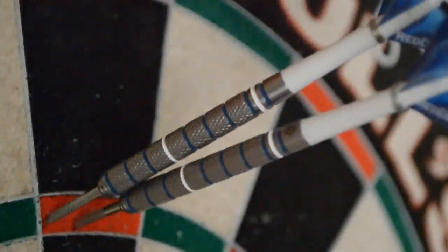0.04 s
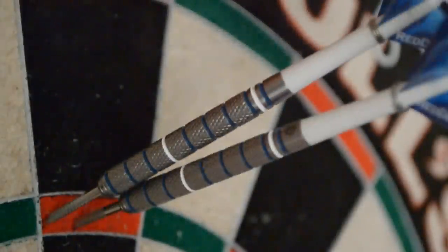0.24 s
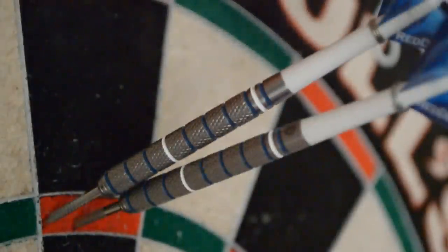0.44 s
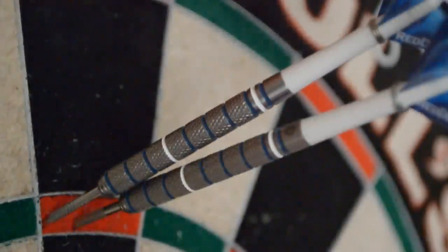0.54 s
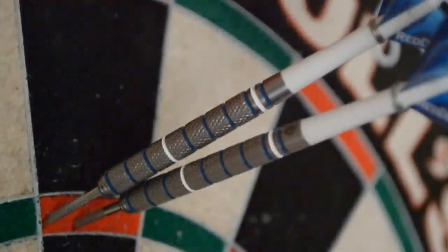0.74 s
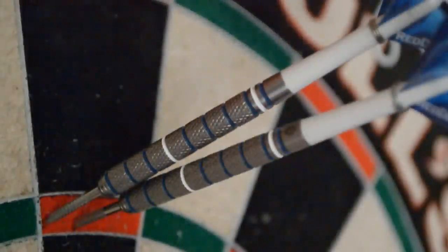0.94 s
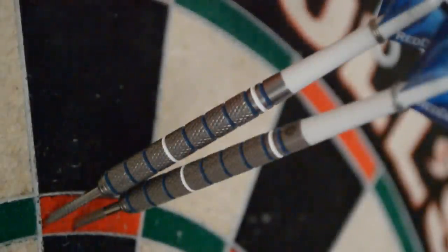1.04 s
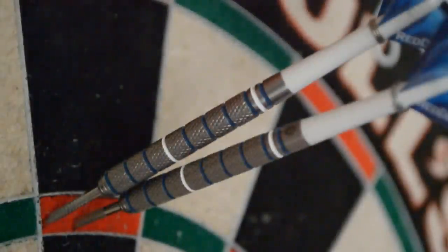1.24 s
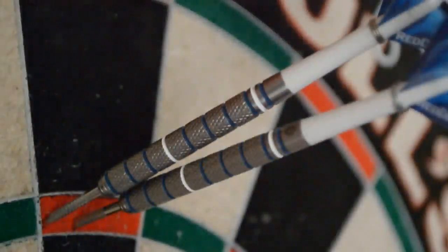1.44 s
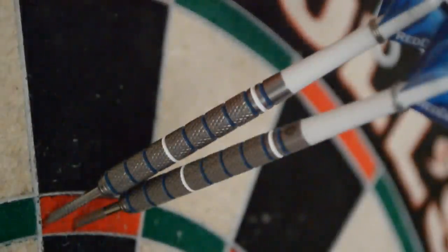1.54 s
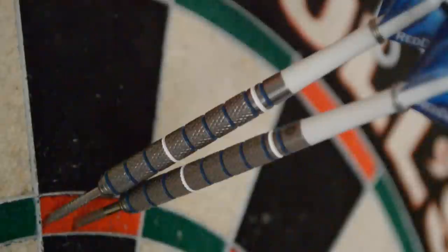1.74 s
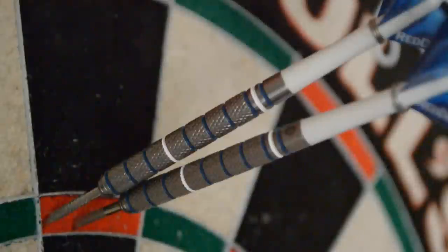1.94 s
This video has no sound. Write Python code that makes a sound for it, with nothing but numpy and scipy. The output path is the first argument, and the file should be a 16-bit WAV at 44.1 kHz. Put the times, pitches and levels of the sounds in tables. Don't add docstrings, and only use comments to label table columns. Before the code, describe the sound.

A steel-tip dart clinks off other metal darts and thuds into a bristle board indoors.

```python
import sys
import numpy as np
from scipy import signal
from scipy.fft import rfft, irfft
from scipy.io import wavfile

SR = 44100
rng = np.random.default_rng(int(sys.argv[2]) if len(sys.argv) > 2 else 0)


def unload_audio(sound):
    columns = np.transpose(np.atleast_2d(sound))
    steps = np.round(np.clip(columns, -1, 1) * 32767)
    wavfile.write(sys.argv[1], SR, steps.astype(np.int16))


def voltage_ratio(decibels):
    exponent = np.asarray(decibels, float) / 20
    return 10 ** exponent


N = 88200


def evened(x):
    return x / np.sqrt(np.mean(x ** 2) + 1e-20)


def read(points, hz):
    table_hz, value = np.transpose(points)
    return np.interp(np.log(hz + 1), np.log(table_hz + 1), value)


def coloured(spectrum):
    white = rfft(rng.standard_normal(N))
    gain = voltage_ratio(read(spectrum, np.fft.rfftfreq(N, 1 / SR)))
    return evened(irfft(white * gain, N))


def ring(modes, start_s, force_db, pitch_factor, push):
    t = np.arange(SR // 4) / SR
    response = 0
    for hz, level_db, t60_s in modes:
        decay = voltage_ratio(level_db - 60 * t / t60_s)
        response = response + decay * np.sin(2 * np.pi * hz * pitch_factor * t)
    sound = np.convolve(response, push)
    out = np.zeros(N)
    out[round(start_s * SR):][:len(sound)] = voltage_ratio(force_db) * sound
    return out


def quiet():
    # pitch_hz, density_db
    hiss_spectrum = [(15, -38), (30, -16), (50, -6.5), (87, -9.5), (200, -5.5), (450, -7), (2000, -11),
                     (16000, -20.5)]
    # pitch_hz, level_db
    hum_partials = [(59.5, -77.5), (117.14, -80), (48, -83)]
    # time_s, level_db
    rumble_levels = [(0, -76), (.3, -87.5), (1.2, -87), (1.4, -77), (1.65, -64.5), (1.8, -75.5), (2, -72.5)]
    rumble_hz, rumble_width_hz = 200, 90
    t = np.arange(N) / SR
    hum = 0
    for hz, level_db in hum_partials:
        phase = rng.random()
        hum = hum + np.sqrt(2) * voltage_ratio(level_db) * np.sin(2 * np.pi * (hz * t + phase))
    bell = np.exp(-((np.fft.rfftfreq(N, 1 / SR) - rumble_hz) / rumble_width_hz) ** 2)
    rumble = evened(irfft(rfft(rng.standard_normal(N)) * bell, N))
    swell = voltage_ratio(np.interp(t, *np.transpose(rumble_levels)))
    return voltage_ratio(-63) * coloured(hiss_spectrum) + hum + rumble * swell


def wall():
    # pitch_hz, level_db, rise_s, t60_s
    wall_modes = [(47, -46, .05, .8), (75, -52, .04, .4), (130, -50, .04, .35), (224, -39, .05, .4),
                  (255, -46, .05, .4), (466, -46, .03, .3), (600, -48, .03, .28)]
    start_s = .245
    t = np.maximum(np.arange(N) / SR - start_s, 0)
    out = 0
    for hz, level_db, rise_s, t60_s in wall_modes:
        envelope = (1 - np.exp(-t / rise_s)) * voltage_ratio(level_db - 60 * t / t60_s)
        out = out + envelope * np.sin(2 * np.pi * hz * t)
    return out


def room(x):
    # pitch_hz, t60_s
    room_decay = [(100, 0.59), (250, 0.34), (600, .38), (1500, .32), (4500, .3), (9000, 0.21), (12000, .18),
                  (15000, .16)]
    # pitch_hz, level_db
    room_colour = [(100, -1.5), (300, -9.5), (800, 4.6), (1800, 0), (4500, -2.5), (9000, -1.5), (12000, -2),
                   (15000, -14.5)]
    level_db, gap_s, spacing = -14, 0.0055, 20
    taps = np.zeros(SR)
    at = np.arange(0, SR - spacing, spacing)
    taps[at + rng.integers(0, spacing, len(at))] = rng.choice([-1., 1.], len(at))
    hz, t, bands = signal.stft(taps, SR, nperseg=256)
    fade_db = read(room_colour, hz)[:, None] - 60 * t / read(room_decay, hz)[:, None]
    tail = signal.istft(bands * voltage_ratio(fade_db), SR, nperseg=256)[1]
    tail = np.append(np.zeros(round(gap_s * SR)), tail / np.linalg.norm(tail))
    return voltage_ratio(level_db) * signal.fftconvolve(x, tail)[:N]


def scatter():
    # pitch_hz, density_db
    burst_spectrum = [(100, -12.5), (250, -2.5), (700, -0.5), (1100, -8.5), (1800, -8.5), (4500, -11.5),
                      (9500, -10.5), (14000, -23.5)]
    level_db, start_s, length_s = -14, .2245, .02
    progress = (np.arange(N) / SR - start_s) / length_s
    envelope = np.sin(np.pi * np.clip(progress, 0, 1))
    return coloured(burst_spectrum) * voltage_ratio(level_db) * envelope


def scrape():
    # pitch_hz, density_db
    rasp_spectrum = [(590, -52), (1000, -19.5), (1790, -10.5), (2180, -8.5), (6330, -8), (8750, -8),
                     (11000, -7.5), (16000, -38.5)]
    rasp_db, rasp_s, hold_s, rasp_t60_s = -16, .2243, .016, 0.026
    rebound_db, rebound_s, rebound_t60_s = -28.5, .2716, .02
    t = np.arange(N) / SR - rasp_s
    late = np.arange(N) / SR - rebound_s
    rasp = (t > 0) * voltage_ratio(rasp_db - 60 * np.maximum(t - hold_s, 0) / rasp_t60_s)
    rebound = (late > 0) * voltage_ratio(rebound_db - 60 * abs(late) / rebound_t60_s)
    return coloured(rasp_spectrum) * (rasp + rebound)


def board():
    # pitch_hz, level_db, t60_s
    board_modes = [(125, -11.5, 0.034), (210, -4.5, 0.055), (396, -3.5, 0.057), (540, -6, 0.029),
                   (666.3, -1, .05), (757, -11, 0.034), (908.5, -16.5, 0.061)]
    # start_s, force_db, push_s
    thumps = [
        (.2245, -38.5, .001),
        (0.233, -25, .001),
        (0.2366, -17.5, 0.00091),
        (.238, -9, .001),
        (.2404, -12, .0008),
        (0.263, -23.5, 0.00048),
    ]
    t = np.arange(300) / SR
    out = 0
    for start_s, force_db, push_s in thumps:
        push = np.sin(np.pi * np.clip(t / push_s, 0, 1)) ** 2
        out = out + ring(board_modes, start_s, force_db, 1, push / push.sum())
    return out


def shaft():
    # pitch_hz, level_db, t60_s
    shaft_modes = [(1764, -3, 0.038), (1873, -4.5, 0.039), (2337, -8, 0.025), (2773, -12, 0.011),
                   (4220, -5, .012), (4486, 1, .015), (1246, -17.5, 0.023)]
    # start_s, force_db
    knocks = [
        (0.2244, -22.5),
        (0.2269, -11.5),
        (0.2321, 2),
        (0.2326, -9.5),
        (0.2383, -16.5),
        (0.2715, -31),
    ]
    return sum(ring(shaft_modes, start_s, force_db - 10, 1, [1]) for start_s, force_db in knocks)


def barrels():
    # pitch_hz, level_db, t60_s
    barrel_modes = [(9294, 8, 0.0071), (8845, -1, .015), (10300, -5, 0.0052), (6490, -8, .01),
                    (5750, -12.5, 0.012), (12500, -16, 0.002), (14600, -24, .006)]
    # start_s, force_db, contact_s, pitch_factor
    glances = [
        (.2243, -2, 0.0009, 1.02),
        (.2252, -5, 0.0013, .99),
        (.2274, -9.5, .0006, .98),
        (.2296, -10.5, .001, 1.1),
        (.2328, -9.5, .001, .95),
        (0.2348, -10.5, 0.00072, 1.01),
        (0.2366, -7.5, 0.0011, 1.15),
        (.2398, -13, .001, 1.05),
        (.2432, -15, .001, .98),
    ]
    n = np.arange(200)
    out = 0
    for start_s, force_db, contact_s, pitch_factor in glances:
        grit = rng.standard_normal(200) + 3 * (n == 0)
        push = grit * np.clip(contact_s * SR - n, 0, 1)
        push = .5 * push / np.linalg.norm(push)
        out = out + ring(barrel_modes, start_s, force_db, pitch_factor, push)
    return out


def scene():
    hit = barrels() + shaft() - board() + scrape()
    bass_cut = signal.butter(2, 150, "high", fs=SR, output="sos")
    hit = signal.sosfilt(bass_cut, hit)
    into_room = voltage_ratio(-5) * hit + scatter()
    return (hit + room(into_room) + wall() + quiet())[None]


def roll_off(x):
    return signal.sosfilt(signal.butter(12, 16830, fs=SR, output="sos"), x)


def record(dry):
    limit = .68
    rounded = limit * np.tanh(dry / limit)
    edge = signal.firwin(255, 15750, fs=SR)[None]
    return roll_off(signal.oaconvolve(rounded, edge, "same"))


dry = scene()
out = record(dry)
unload_audio(out)
```